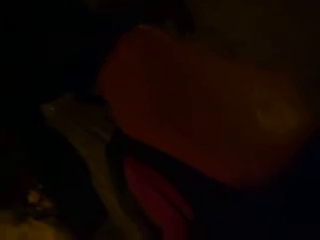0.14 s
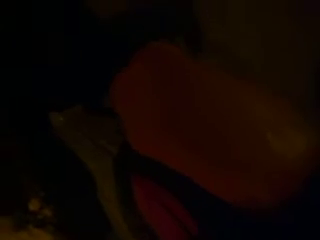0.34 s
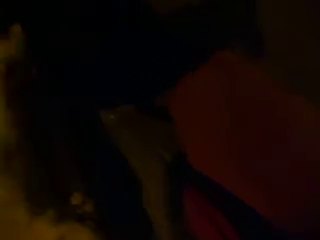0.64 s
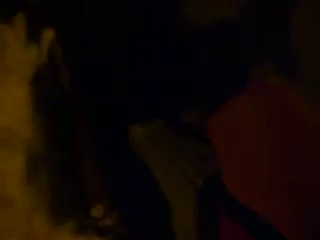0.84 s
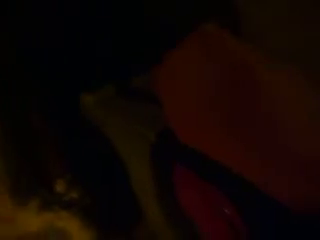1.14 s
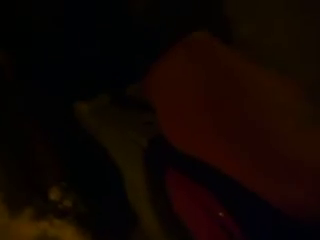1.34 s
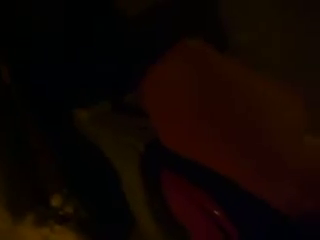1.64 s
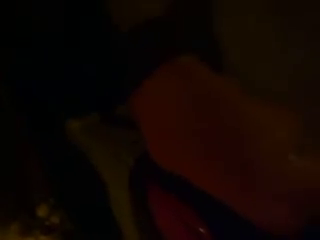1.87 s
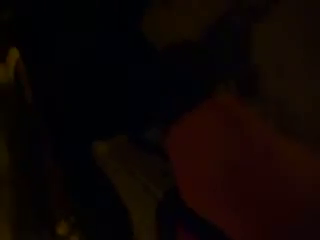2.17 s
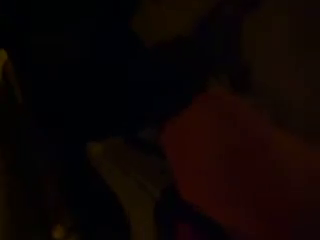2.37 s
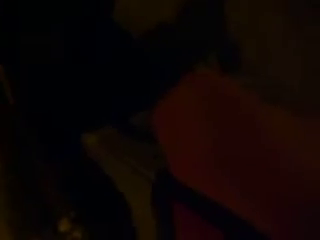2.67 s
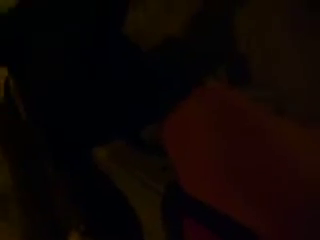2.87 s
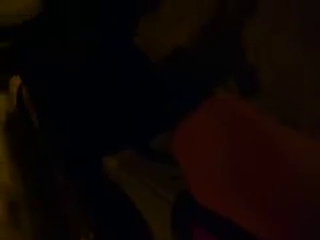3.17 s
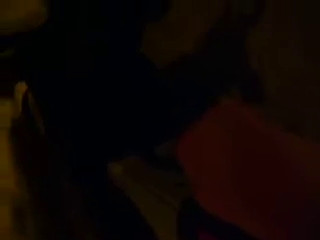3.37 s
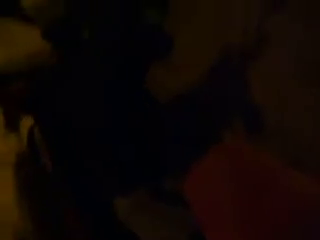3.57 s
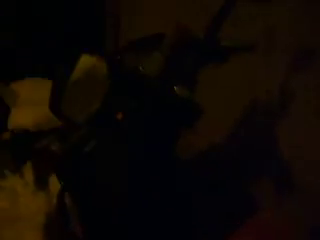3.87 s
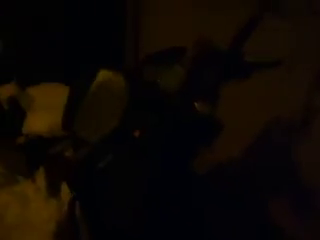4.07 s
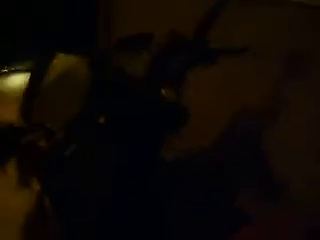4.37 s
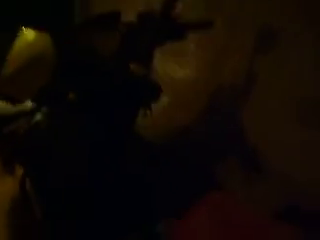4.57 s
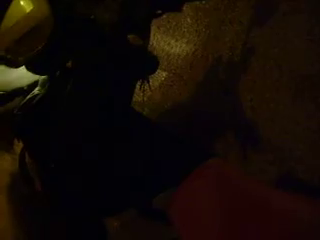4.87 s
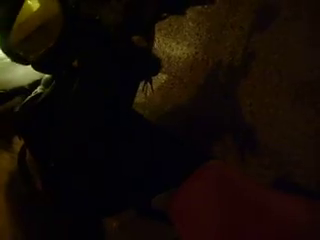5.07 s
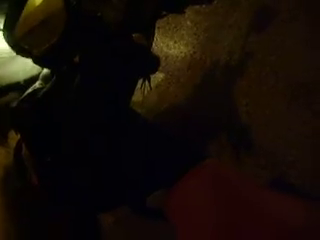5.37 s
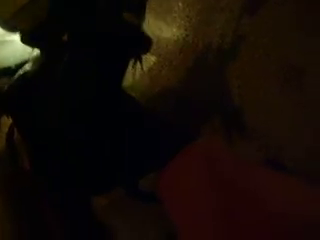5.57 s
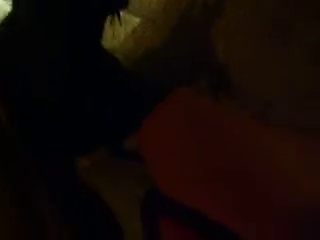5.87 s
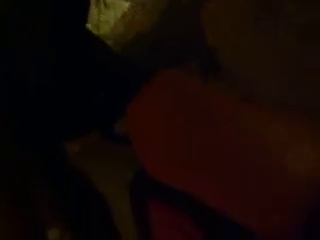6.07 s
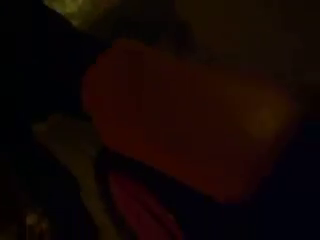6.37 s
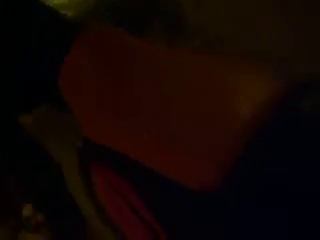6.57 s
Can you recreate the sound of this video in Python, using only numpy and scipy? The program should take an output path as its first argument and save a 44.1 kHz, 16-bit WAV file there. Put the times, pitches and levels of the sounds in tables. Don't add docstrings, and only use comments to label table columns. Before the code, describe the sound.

A kick lever snaps with bright steel pings against a quiet night of far crickets and low traffic. Two kicks only make the cold engine chuff and wheeze to silence, with foot shuffles between. After a third heavy clatter the two-stroke fires, rattling and buzzing, and slowly climbs in speed while the lever clacks back. Close, dry, mono pickup with little deep bass.

```python
import sys
import numpy as np
from scipy import signal
from scipy.fft import rfft, irfft, next_fast_len
from scipy.io import wavfile
from scipy.ndimage import uniform_filter1d

SR = 44100
rng = np.random.default_rng(int(sys.argv[2]) if len(sys.argv) > 2 else 0)


def inscribe(sig):
    pcm = np.round(np.clip(np.atleast_2d(sig).T, -1, 1) * 32767)
    wavfile.write(sys.argv[1], SR, pcm.astype(np.int16))


def voltage_ratio(level):
    return 10 ** (np.asarray(level, float) / 20)


N = 296773
TIME = np.arange(N) / SR
BLOW_TIME = TIME[:9000]

# start in seconds, peak in dB,
# weight (middle against the peak) in dB, T60 in seconds.
FIRST_KICK = [(0.5525, -40.5, -0.5, 0.074), (0.565, -41, -3, 0.15), (0.602, -35, -3, 0.057),
              (0.629, -30, 0, 0.098), (0.6349, -19.5, -12, 0.072), (0.7037, -41, -4.5, 0.55),
              (0.7486, -31.5, -5, 0.063), (.756, -37, -2, 0.041), (.777, -38, -10, .05),
              (0.7847, -22.5, -4.5, 0.15), (0.7947, -27.5, -8, 0.08), (0.8105, -30, -13, 0.067),
              (.817, -30, -16, .07), (0.821, -47, 4, 0.054), (0.8334, -51, 5, 0.043),
              (0.9124, -39.5, -7.5, 0.8)]
# start in seconds, wheeze peak in dB,
# T60 in seconds, exhaust beat in dB.
FIRST_COAST = [(0.636, -60, .05, -53), (.705, -61, .05, -52), (0.739, -60, .05, -50),
               (0.785, -60, 0.05, -45), (0.8273, -30, 0.049, -44), (0.889, -51, 0.08, -42),
               (0.9494, -26.5, 0.22, -40), (1.01, -59, 0.073, -43), (1.0682, -26.5, 0.17, -39),
               (1.122, -40, 0.1, -43), (1.185, -44, 0.026, -44), (1.299, -36.5, 0.15, -46),
               (1.327, -39, 0.1, -60), (1.3537, -44.5, 0.088, -55), (1.425, -33.5, 0.061, -52.5),
               (1.46, -42, 0.025, -54), (1.495, -39, 0.041, -69)]
SECOND_COAST = [(2.166, -60, .05, -50), (2.214, -35, 0.1, -44), (2.234, -60, .05, -48),
                (2.291, -55, .05, -44), (2.349, -40, 0.048, -43), (2.3996, -38, 0.32, -42.5),
                (2.475, -33.5, 0.19, -41), (2.53, -54, 0.08, -45), (2.564, -35, 0.075, -60),
                (2.611, -31, 0.14, -42.5), (2.67, -42, 0.062, -46), (2.7588, -30.5, 0.19, -42),
                (2.828, -45, 0.064, -50), (2.9259, -29, 0.16, -40), (2.996, -33, 0.12, -45),
                (3.047, -41, 0.17, -52.5), (3.1162, -38, 0.12, -50), (3.1714, -39.5, 0.11, -58)]
# time in seconds, level in dB.
SPIN = [
    [(.54, -19), (.6, -30), (.644, 2), (.692, -9), (.752, -1), (.792, 8), (.934, -1.5), (1.166, 1),
     (1.56, -16.5)],
    [(2.06, -33), (2.2, 1), (2.27, 4.5), (2.43, -1.5), (2.53, 2.5), (2.57, -4.5), (2.62, 0.5), (2.94, -1),
     (3.26, -17)],
    [(4.02, -22), (4.06, -14), (4.08, 5.5), (4.12, 6), (4.17, -10), (4.19, 13.5), (4.21, 6), (4.3, -13)],
]
# time in seconds, speed in turns a second.
SPEED = [(4.33, 20.737), (5.0, 21.421), (5.55, 26.56), (6.73, 30.21)]
# frequency in Hz, width in Hz, level in dB.
CRANKCASE = [(862, 22, 4.5), (1190, 34, 7), (1450, 76, 6), (1670, 63, 7.5), (2039, 21, 10.5), (2690, 22, 0)]
# frequency in Hz, level in dB per Hz.
HISS = [(1530, -10), (2600, -5), (3290, -6), (4620, -7), (5060, -5), (5460, -8), (9650, -32.5),
        (12000, -43), (15600, -79), (22000, -120)]
RUNS_S = 4.235


def evened(x):
    return x / np.sqrt(np.mean(x ** 2) + 1e-20)


def add(mix, s, sound):
    part = mix[round(s * SR):][:len(sound)]
    part += sound[:len(part)]


def tone(hz):
    return np.sin(2 * np.pi * hz * BLOW_TIME)


def coloured(x, points):
    f, db = np.transpose(points)
    size = next_fast_len(len(x), True)
    hz = np.fft.rfftfreq(size, 1 / SR)
    gain = voltage_ratio(np.interp(np.log(hz + 1), np.log(f + 1), db, -90, -90))
    return evened(irfft(rfft(x, size) * gain, size)[:len(x)])


def resonated(x, modes):
    out = np.zeros(len(x))
    for hz, width, db in modes:
        r = np.exp(-np.pi * width / SR)
        poles = [1, -2 * r * np.cos(2 * np.pi * hz / SR), r * r]
        out += voltage_ratio(db) * signal.lfilter([1 - r, 0, r - 1], poles, x)
    return out


def warmed(x, modes, drift):
    angle = 2 * np.pi * np.cumsum(np.interp(TIME, *np.transpose(drift))) / SR
    out = np.zeros(N)
    for hz, width, db in modes:
        turn = np.exp(1j * hz * angle)
        r = np.exp(-np.pi * width / SR)
        out += voltage_ratio(db) * 2 * (turn * signal.lfilter([1 - r], [1, -r], x / turn)).real
    return out


def level(tables, db=0, share=1):
    out = np.zeros(N)
    for rows in tables:
        s, curve = np.transpose(rows)
        inside = (TIME >= s[0]) * (TIME <= s[-1])
        out += voltage_ratio(db + share * np.interp(TIME, s, curve)) * inside
    return uniform_filter1d(out, size=400)


def flutter(size):
    return evened(uniform_filter1d(uniform_filter1d(rng.standard_normal(N), size), size))


def envelope(t60, rise):
    shape = (1 - np.exp(-BLOW_TIME / rise)) * voltage_ratio(-60 * BLOW_TIME / t60)
    return shape / shape.max()


def grains(per_s, spread_db):
    size = voltage_ratio(spread_db * np.minimum(rng.exponential(1, N), 4)) * rng.choice([-1, 1], N)
    return size * (rng.random(N) < per_s / SR)


def chugs():
    out = np.zeros(N)
    for s, *_ in FIRST_COAST + SECOND_COAST:
        add(out, s, envelope(0.22, 0.0002))
    coasting = (TIME > FIRST_KICK[-3][0]) & (TIME < SECOND_COAST[-1][0] + .15)
    coasting &= abs(TIME - 2.1) > .25
    return np.where(coasting, .45 + .9 * np.minimum(out, 1), 1)


def running(db, per_speed_db):
    speed = np.interp(TIME, *np.transpose(SPEED))
    return voltage_ratio(db + per_speed_db * np.log2(speed / speed[0])) * np.clip((TIME - RUNS_S) / 0.041, 0, 1)


def driven(kicked_db, share, caught_db, per_speed_db):
    return level(SPIN, kicked_db, share) + running(caught_db, per_speed_db)


def night():
    # frequency in Hz, level in dB per Hz.
    traffic = [(15, 9), (50, 7), (100, -6), (160, 2), (407, 2), (463, 0), (839, -3.5), (906, 1),
               (1090, -4.5), (1680, -7.5), (2240, -14), (2900, -7.5), (3560, -10.5), (4860, -10.5),
               (5390, -10), (6130, -16), (12000, -28.5), (15600, -55), (22000, -120)]
    # frequency in Hz, width in Hz, level in dB, pulses a second.
    crickets = [(5360, 70, -76.5, 58), (2940, 72, -75, 62), (1670, 60, -77.5, 45), (7330, 70, -88, 50)]
    out = voltage_ratio(-65 + 0.27 * flutter(5000)) * coloured(rng.standard_normal(N), traffic)
    for hz, width, db, per_s in crickets:
        beat = np.cumsum(per_s * (1 + 0.069 * flutter(900))) / SR
        strokes = (.7 + np.maximum(np.cos(2 * np.pi * beat), 0)) * rng.standard_normal(N)
        out += voltage_ratio(db + 0.77 * flutter(4000)) * evened(resonated(strokes, [(hz, width, 0)]))
    return out


def shuffle():
    # top in seconds, level in dB, swell in seconds, fade in seconds (both to -20 dB).
    rubs = [
        (.008, -63.5, .006, 0.1),
        (.085, -61, 0.012, 0.32),
        (.116, -80, 0.0081, 0.1),
        (1.615, -73.5, 0.015, 0.6),
        (1.678, -61.5, 0.039, 0.07),
        (3.524, -68.5, 0.061, 0.07),
        (3.602, -62, 0.059, 0.13),
        (3.742, -78, .05, 0.5),
    ]
    # frequency in Hz, level in dB per Hz.
    rubber = [(88, -27), (150, -38), (322, 7), (755, 1.5), (922, -2), (2050, 1.5), (2370, -23),
              (4720, -5.5), (11500, -31), (15000, -51), (22000, -120)]
    grit = evened(grains(1500, 4)) + rng.standard_normal(N)
    press = np.zeros(N)
    for s, db, swell, fade in rubs:
        press += voltage_ratio(db - 20 * np.maximum((s - TIME) / swell, (TIME - s) / fade))
    return press * coloured(grit, rubber) * voltage_ratio(0.5 * flutter(200) + 5.0)


def blows():
    # start in seconds, peak in dB, weight (middle against the peak)
    # in dB, T60 in seconds, top against the peak in dB.
    clicks = [(0.0374, -21, -11, 0.077, -12.5), (0.11, -50.5, 7, 0.12, -25), (0.126, -56, 7, 0.091, -22),
              (0.331, -23, -11.5, 0.079, -26.5), (0.9681, -22.5, -7.5, 0.064, -13),
              (1.6088, -39, -19.5, 0.065, -23.5), (1.678, -41.5, -7, 0.056, -23),
              (1.716, -48.5, 2, 0.084, -13), (1.93, -28, -10.5, 0.089, -30), (2.425, -27.5, -14, 0.11, -15),
              (2.847, -31.5, -29.5, 0.045, -32), (2.869, -37, -26, 0.14, -26),
              (2.9619, -32.5, -6.5, 0.15, -21), (3.5556, -45, -18, 0.31, -18),
              (3.6018, -42.5, -11, 0.12, -22), (3.631, -55, 9.5, 0.085, -22),
              (3.8726, -25, -14.5, 0.1, -26.5), (4.3553, -36.5, 1, 0.078, -26),
              (4.4842, -39, -1, 0.037, -20), (4.986, -30, -6.5, 0.084, -14),
              (5.7417, -18, -15, 0.091, -25.5), (5.77, -38, -16, 0.31, -24),
              (6.2707, -26.5, -4.5, 0.07, -23)]
    # start in seconds, peak in dB, weight in dB, T60 in seconds.
    second_kick = [(2.0671, -41.5, -3.5, 0.082), (2.082, -42.5, 1, 0.073), (2.112, -31, -6, 0.11),
                   (2.1274, -30, -6, 0.052), (2.1303, -17, -10, 0.11), (2.137, -25, -19, 0.072),
                   (2.151, -34, -11, 0.069), (2.2144, -37.5, 0, 0.16), (2.241, -42, -6, .06),
                   (2.256, -38, -8, .08), (2.2622, -23.5, -1.5, 0.14), (2.2772, -22, -12, 0.12),
                   (2.283, -20.5, -5, 0.11), (2.2913, -14, -10.5, 0.055), (2.3, -19.5, -8, 0.091)]
    third_kick = [(4.0264, -37.5, -4, 0.12), (4.037, -41.5, -2, 0.069), (4.0652, -15, -12.5, 0.086),
                  (4.145, -33, -15, 0.056), (4.1512, -26.5, -3.5, 0.18), (4.1935, -11.5, -4.5, 0.081),
                  (4.206, -21, -12, 0.17), (4.2217, -10, -10.5, 0.09), (4.2308, -12.5, -12, 0.085),
                  (4.247, -19, -25, 0.1), (4.260, -31, -18, 0.4)]
    # frequency in Hz, width in Hz, level in dB.
    arm_ring = [(3600, 130, -6), (3910, 190, 3.5), (4390, 140, 7), (4920, 140, 9), (5300, 280, -1)]
    out = np.zeros(N)
    edges_hz = [(150, 580), (720, 2300), (2300, 6400), (5800, 10600)]
    filters = [signal.butter(4, e, "bandpass", fs=SR, output="sos") for e in edges_hz]
    kicks = []
    for s, peak_db, mid_db, t60 in FIRST_KICK + second_kick + third_kick:
        top_db = -17 + 0.28 * mid_db + 0.18 * (peak_db + 20)
        kicks.append((s, peak_db, mid_db, t60, top_db))
    crack = 1 + 1.6 * np.exp(-BLOW_TIME / .002)
    echo = .05 * envelope(.2, .006)
    for s, peak_db, mid_db, t60, top_db in clicks + kicks:
        low_db = -6 + 1.11 * mid_db
        noise = rng.standard_normal(len(BLOW_TIME))
        low, mid, high, top = (evened(signal.sosfilt(f, noise)) for f in filters)
        ring = evened(resonated(high, arm_ring))
        body = (0.25 * high + 0.32 * ring) * envelope(t60, 0.000085) * crack + echo * high
        body += voltage_ratio(top_db) * top * (envelope(0.43 * t60, 0.00028) * crack ** 2 + 5.0 * echo)
        body += voltage_ratio(mid_db) * mid * (envelope(0.81 * t60, 0.00026) * np.sqrt(crack) + echo)
        body += voltage_ratio(low_db) * low * envelope(t60, 0.0032)
        add(out, s, voltage_ratio(peak_db - 10) * body)
    return out


def pings():
    # start in seconds, peak in dB, frequency in
    # Hz.
    strikes = [(0.0375, -15, 4700), (0.6348, -23.5, 7500), (.635, -22.5, 3090), (0.748, -41, 8580),
               (2.131, -18.5, 7570), (2.2917, -14.5, 6040), (2.2912, -22, 2550), (4.194, -10, 5770),
               (4.222, -16, 7800), (4.065, -27, 9300), (4.0275, -40, 1950), (0.3316, -25, 4950),
               (0.601, -28, 3580), (0.635, -22.5, 4520), (0.9683, -21.5, 4600), (1.9306, -26.5, 4770),
               (2.112, -28, 3640), (2.13, -12.5, 4420), (2.4259, -21.5, 4700), (4.0642, -16.5, 3120),
               (4.1945, -12, 4460), (4.2215, -10.5, 5560), (4.231, -16, 5530), (4.9861, -27.5, 4800),
               (5.7416, -19, 4780),
               (.0376, -27, 2300), (.0376, -32, 9230), (.6293, -27, 3400), (.6372, -22, 5200),
               (.6408, -26, 5000), (.7778, -34, 5600), (.7853, -21.5, 4800), (.791, -26, 5400),
               (.7997, -28, 4400), (.8135, -30, 3000), (2.1328, -15.5, 4280), (2.137, -19, 5300),
               (2.142, -22, 5000), (2.15, -25, 5400), (2.2808, -23, 5600), (2.285, -23, 5300),
               (2.297, -23, 5600), (2.3035, -25, 4580), (3.8732, -24.5, 3600), (4.0715, -22, 4600),
               (4.0765, -26, 3420), (4.0828, -30, 2900), (4.2245, -12, 4570), (4.2347, -11, 5610),
               (4.242, -19, 5400), (4.2552, -26, 5200), (4.2598, -23, 5000)]
    out = np.zeros(N)
    for s, peak_db, hz in strikes:
        add(out, s, voltage_ratio(peak_db - 8.5) * envelope(0.017, 0.0002) * (tone(hz) + 0.5 * tone(1.035 * hz)))
    return out


def thuds():
    # start in seconds, peak in dB, frequency in Hz, T60 in seconds.
    frame = [
        (0.331, -46, 154, 0.15),
        (0.632, -49.5, 160, 0.16),
        (1.929, -49, 157, 0.15),
        (2.131, -39, 160, 0.14),
        (3.874, -43.5, 161, 0.054),
        (4.065, -39.5, 151, 0.1),
        (4.192, -30, 142, 0.11),
    ]
    cover = [(0.7853, -24, 980, 0.03), (.7935, -28, 900, .04), (0.786, -33, 1170, 0.064),
             (0.79, -28, 792, 0.041), (2.129, -28, 2093, 0.051), (2.131, -31, 320, 0.11),
             (2.132, -30, 560, .07), (.637, -38, 320, .08), (2.262, -30, 1065, 0.05),
             (4.193, -18, 1300, 0.042), (4.194, -23, 804, 0.13), (4.194, -22, 2180, 0.046),
             (4.196, -21, 522, 0.06), (4.206, -17.5, 818, 0.023), (4.223, -22, 1416, .04),
             (4.224, -22, 2186, .03), (4.327, -30.5, 1590, 0.067), (5.742, -32, 1290, 0.05)]
    out = np.zeros(N)
    for s, peak_db, hz, t60 in frame + cover:
        add(out, s, voltage_ratio(peak_db - 4.0) * tone(hz) * envelope(t60, .5 / hz))
    return out


def arm_returns():
    # frequency in Hz, level in dB, T60 in seconds.
    arm_modes = [(1343, -8, 0.045), (1945, -6, 0.03), (2320, -18, 0.075), (2550, -11.5, 0.048),
                 (3393, -7.5, 0.052), (3750, -10, 0.034), (3990, -11.5, .06), (5230, -18, 0.13),
                 (6340, -20, 0.03), (7070, -17, 0.029), (7800, -16, 0.037)]
    # start in seconds, peak in dB.
    stops = [
        (0.0375, -31),
        (.3316, -36.5),
        (.9685, -36),
        (1.9309, -36.5),
        (2.4252, -43),
        (3.8727, -36.5),
        (4.986, -40),
        (5.7418, -29),
    ]
    out = np.zeros(N)
    for s, peak_db in stops:
        for (hz, db, t60), tilt in zip(arm_modes, rng.standard_normal(len(arm_modes))):
            ring = envelope(.8 * t60, 0.00021) * tone(hz * (1 + 0.016 * tilt))
            shake = 1 + 0.47 * np.cos(2 * np.pi * 90 * (2 + tilt) * BLOW_TIME)
            add(out, s, voltage_ratio(peak_db + db + 2.8 * tilt) * ring * shake)
    return out


def lever():
    # delay in seconds, level in dB.
    walls = [(.0023, -13), (.0062, -18), (.0085, -15.5), (.0119, -19.5), (.0163, -16.5), (.0195, -20),
             (.0272, -19)]
    out = blows() + pings() + thuds() + arm_returns()
    direct = signal.sosfilt(signal.butter(2, 7000, fs=SR, output="sos"), out)
    for k, (delay, db) in enumerate(walls):
        add(out, delay, (-1) ** k * voltage_ratio(db) * direct)
    return out


def running_turns():
    slips = (21, 25)
    turns = np.cumsum(np.interp(TIME, *np.transpose(SPEED))) / SR
    firing = np.arange(30)
    fired = 2 * firing + np.searchsorted(slips, firing, "right")
    return turns - np.interp(SPEED[0][0], TIME, turns), fired


def exhaust_beat(turns, fired, cycle, pipe, heat):
    lit = TIME > RUNS_S
    late = turns - .33
    at = np.flatnonzero(np.diff(np.floor(late)) > 0)
    fires = np.isin(np.floor(late[at + 1]), fired)
    hurry = .004 * SR * np.clip((np.gradient(turns)[at] * SR - 21.2) / 3, 0, 1)
    moved = at + (np.where(fires, 1, -1) * hurry).astype(int)
    pulses = np.zeros(N)
    strength = voltage_ratio(0.45 * rng.standard_normal(len(at)))
    pulses[np.minimum(moved, N - 1)] = np.where(fires, 1, -.8) * strength
    pulses = signal.oaconvolve(pulses * lit, np.hanning(300) / 150)[:N]
    gas = 0.0069 * rng.standard_normal(N) * lit
    beat = warmed(pulses + voltage_ratio(-73) * cycle + gas, pipe, heat)
    beat = signal.lfilter(*signal.butter(2, 70, "highpass", fs=SR), beat)
    beat = signal.lfilter(*signal.butter(3, 175, fs=SR), beat)
    return beat * running(-53, 9.5) / np.sqrt(np.mean(beat[lit] ** 2))


def dead_beat(pipe):
    air = np.zeros(N)
    for s, *_, peak_db in FIRST_COAST + SECOND_COAST:
        opens = s + 0.007
        add(air, opens, voltage_ratio(peak_db + 48.0) * np.hanning(260) / 130)
        add(air, opens, voltage_ratio(peak_db + 14.5) * np.hanning(1800) * rng.standard_normal(1800))
    air += level(SPIN, -37.5, 0.63) * rng.standard_normal(N)
    return resonated(air, pipe)


def silencer_hum(turns, cycle, heat):
    # frequency in Hz, width in Hz, level in dB.
    shell = [(284, 13, 3), (418, 8.3, 0), (350, 7.6, -8)]
    chamber_gas = [(268, 24, 2), (224, 10, 0), (291, 12, 0), (250, 14, -3)]
    hum_level = (-52.5, 1.02, -51.5, 10)
    lit = TIME > RUNS_S
    throb = 1 + 0.037 * np.cos(2 * np.pi * (turns - .53)) * lit
    flow = rng.standard_normal(N) * throb + voltage_ratio(-24) * cycle
    hum = evened(resonated(flow, shell) + warmed(flow, chamber_gas, heat))
    hum = signal.sosfilt(signal.butter(4, 200, "highpass", fs=SR, output="sos"), hum)
    hum *= chugs() * np.where(lit, 1 / hum[lit].std(), 1 / hum[~lit].std())
    return hum * driven(*hum_level)


def exhaust(turns, fired):
    # frequency in Hz, width in Hz, level in dB.
    pipe = [(108, 26, 0), (139, 12, -6), (62, 37, -13.5), (88, 12, -5)]
    # time in seconds, factor.
    heat = [(4.3, 0.94), (5.1, 1.07), (5.9, 1.194), (6.73, 1.21)]
    cycle = np.zeros(N)
    for k in range(6, 36):
        cycle += np.cos(np.pi * k * turns + 2 * np.pi * rng.random())
    cycle *= TIME > RUNS_S
    beats = exhaust_beat(turns, fired, cycle, pipe, heat) + dead_beat(pipe)
    return beats + silencer_hum(turns, cycle, heat)


def clutch_bell(turns, grit):
    # time in seconds, level in dB.
    rattle = [
        [(4.27, -53.5), (4.78, -53.5), (5.0, -61), (5.2, -78)],
    ]
    # time in seconds, pitch factor.
    sag = [(4.3, 1.03), (4.6, 0.99), (5.0, .96)]
    ring = warmed(warmed(grit, [(1500, 150, 0)], sag), [(1475, 120, 0)], sag)
    return level(rattle) * voltage_ratio(6 * np.cos(2 * np.pi * (turns - .1))) * evened(ring)


def casing(turns, fired):
    # frequency in Hz, level in dB per Hz.
    whirr_tone = [(240, -13), (400, 1.5), (457, -12.5), (503, -1), (550, -11.5), (633, -3), (885, -5.5),
                  (976, -2.5), (1070, -9), (1440, -0.5), (2470, -13), (2690, -14), (3300, -27.5),
                  (4290, -25), (7260, -120)]
    # frequency in Hz, width in Hz, level in dB.
    hot_case = [(620, 39, -1), (792, 61, -2.5), (980, 25, -6), (1440, 78, -0.5), (1605, 89, 0.5),
                (1746, 78, 2), (2280, 29, -17)]
    gears = [(2670, 66, 2), (3000, 71, 0), (5080, 110, -8), (3870, 100, -8)]
    whirr_level = (-53.5, 1.08, -49.5, 7)
    hiss_level = (-58, 1.63, -55, 9.5)
    swell = voltage_ratio(1.3 * np.cos(2 * np.pi * (turns - .15)) + 1.5 * flutter(150))
    since = turns - fired[np.maximum(np.searchsorted(fired, turns) - 1, 0)]
    swell *= voltage_ratio(uniform_filter1d(np.cos(np.pi * (since - .45)), size=300) * (turns > 0))
    grit = evened(grains(2500, 0.79)) + 1.42 * rng.standard_normal(N)
    cold_ring = evened(resonated(grit, CRANKCASE))
    hot_ring = evened(resonated(grit, hot_case))
    whirr = 0.95 * coloured(grit, whirr_tone) + 0.36 * np.where(TIME < RUNS_S, cold_ring, hot_ring)
    hiss = coloured(grit + rng.standard_normal(N), HISS)
    steady = driven(*whirr_level) * whirr + driven(*hiss_level) * hiss
    steady += running(-64.5, 4) * evened(resonated(grit, gears))
    return swell * (steady * chugs() + clutch_bell(turns, grit))


def wheezes():
    # start in seconds, peak in dB, frequency in Hz, T60 in seconds.
    sung = [(.829, -39, 1460, .1), (.953, -41, 2050, 0.061), (1.071, -43, 1460, 0.086),
            (1.072, -42, 2035, 0.052), (1.124, -41, 1502, 0.09), (1.187, -46.5, 1730, 0.074),
            (1.302, -46, 1760, 0.081), (1.328, -45, 1417, 0.067), (1.426, -46.5, 1560, .07),
            (1.496, -47.5, 1674, .04), (2.222, -43, 1610, 0.057), (2.401, -46, 1470, 0.078),
            (2.477, -43.5, 2030, 0.11), (2.478, -47, 1440, 0.17), (2.569, -48, 1710, 0.058),
            (2.615, -40.5, 2050, 0.083), (2.616, -48, 2690, .08), (2.671, -45, 1565, 0.065),
            (2.672, -52, 2030, .1), (2.762, -42.5, 2020, 0.088), (2.763, -45, 864, 0.061),
            (2.762, -49, 2690, .07), (2.828, -43.5, 1735, 0.078), (2.93, -43, 1700, .1),
            (2.963, -43, 1750, 0.056), (2.998, -42, 1740, 0.085), (3.118, -44, 1660, .07),
            (3.174, -48.5, 1494, 0.062)]
    ring, hiss, notes = np.zeros((3, N))
    for s, peak_db, t60, _ in FIRST_COAST + SECOND_COAST:
        hiss_db = -16.5 + 3 * np.log2(10 * t60)
        add(ring, s, voltage_ratio(peak_db - 15.0) * envelope(t60, 0.0024))
        add(hiss, s, voltage_ratio(peak_db + hiss_db - 2.5) * envelope(t60, 0.0015))
    for s, peak_db, hz, t60 in sung:
        add(notes, s, voltage_ratio(peak_db) * envelope(t60, .0022) * tone(hz))
    air = rng.standard_normal((2, N))
    chatter = air[0] + 1.3 * evened(grains(500, 3))
    breath = uniform_filter1d(uniform_filter1d(coloured(air[1], HISS), size=5), size=3)
    rough = 1 + .75 * flutter(size=55)
    return ring * evened(resonated(chatter, CRANKCASE)) + hiss * breath + notes * rough


def firing_puffs(turns, fired):
    # frequency in Hz, level in dB.
    puff_tone = [(1800, -42.5), (2800, -3.5), (4000, -4), (5200, -5), (6500, -5), (8500, -20), (11000, -28),
                 (12500, -32)]
    # frequency in Hz, width in Hz, level in dB.
    nozzle = [(2660, 250, -1.5), (5000, 390, 0.5), (7820, 370, -9)]
    fins = [(1680, 200, -3), (2724, 160, -1), (5020, 260, -3), (7900, 400, -8)]
    puff_db = -50.5
    puffs, slaps = np.zeros((2, N))
    blow = envelope(0.069, 0.0036)
    for turn, (late, size) in zip(fired, rng.standard_normal((len(fired), 2))):
        s = np.interp(turn, turns, TIME) + 0.0012 * late - .002
        add(puffs, s, voltage_ratio(size + 7.5 * (turn == 0)) * blow)
        add(slaps, s + .005, voltage_ratio(4 * late) * np.hanning(7))
        add(puffs, np.interp(turn + 1.34, turns, TIME), voltage_ratio(-20) * blow)
    puffs *= running(puff_db, 3.7)
    jet = coloured(rng.standard_normal(N), puff_tone)
    whistle = voltage_ratio(-10) * evened(resonated(rng.standard_normal(N), nozzle))
    return running(puff_db + 15, 2.7) * resonated(slaps, fins) * 5 + puffs * (jet + whistle)


def shell_songs():
    # start in seconds, end in seconds, start frequency in Hz, end frequency in Hz, level in dB.
    passes = [
        (4.8, 5.2, 224, 228, -55),
        (5.28, 5.5, 276, 300, -47),
        (5.4, 6.1, 261, 270, -52),
        (5.75, 6.15, 281, 288, -49),
        (5.45, 6.25, 414, 416, -54),
        (6.05, 6.8, 305, 330, -48),
        (6.2, 6.8, 345, 350, -52),
    ]
    out = np.zeros(N)
    for start, end, from_hz, to_hz, db in passes:
        u = np.clip((TIME - start) / (end - start), 0, 1)
        hz = (from_hz + (to_hz - from_hz) * u) * (1 + .008 * flutter(size=1500))
        swell = voltage_ratio(db + 2.5 * flutter(size=900)) * np.sqrt(abs(np.sin(np.pi * u)))
        out += swell * np.sin(2 * np.pi * np.cumsum(hz) / SR)
    return out


def scene():
    turns, fired = running_turns()
    mix = night() + shuffle() + lever()
    mix += exhaust(turns, fired) + casing(turns, fired) + wheezes()
    mix += firing_puffs(turns, fired) + shell_songs()
    return mix[None]


def top_cut(x):
    return signal.sosfilt(signal.butter(12, 12510, fs=SR, output="sos"), x)


def record(dry):
    # frequency in Hz, level in dB.
    microphone = [(0, -10), (50, -7), (95, 0), (9500, 0), (11000, -8), (12000, -17.5), (12500, -34),
                  (13000, -70), (22050, -90)]
    hz, db = np.transpose(microphone)
    size = next_fast_len(N, True)
    gain = voltage_ratio(np.interp(np.fft.rfftfreq(size, 1 / SR), hz, db))
    heard = irfft(rfft(dry, size) * gain, size)[:, :N]
    return top_cut(heard)


dry = scene()
out = record(dry)
inscribe(out)
```